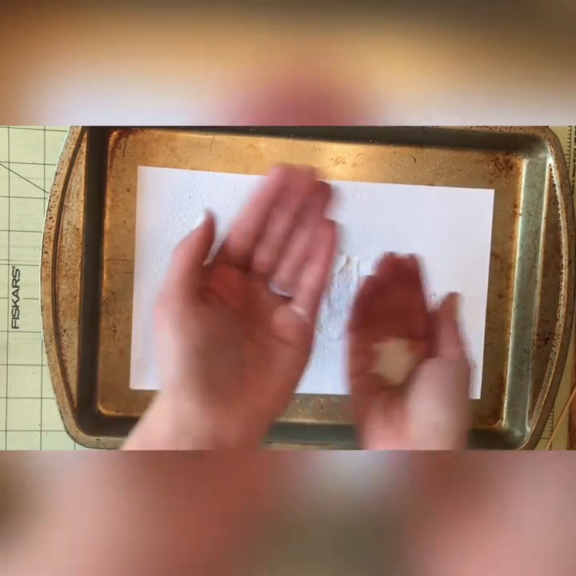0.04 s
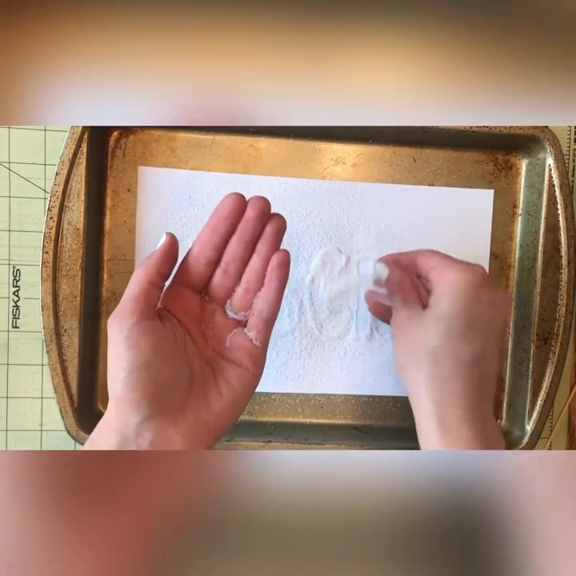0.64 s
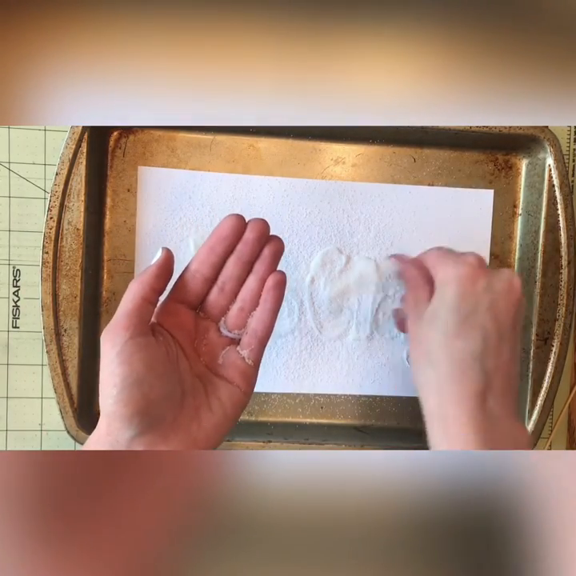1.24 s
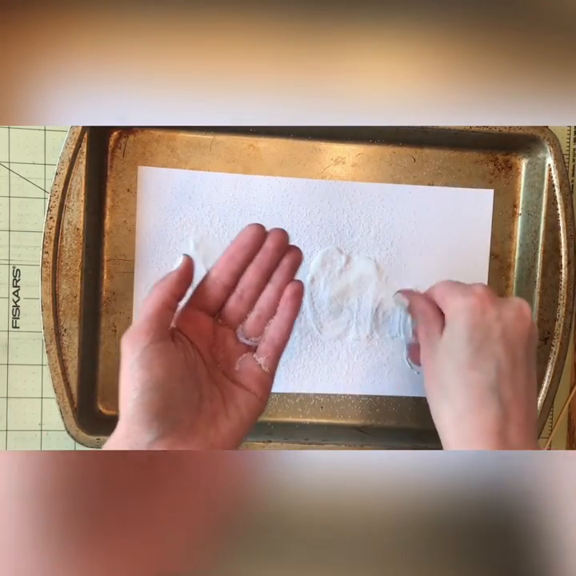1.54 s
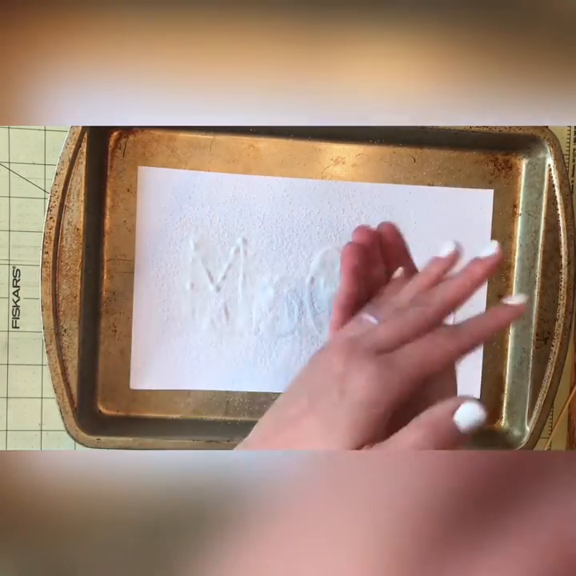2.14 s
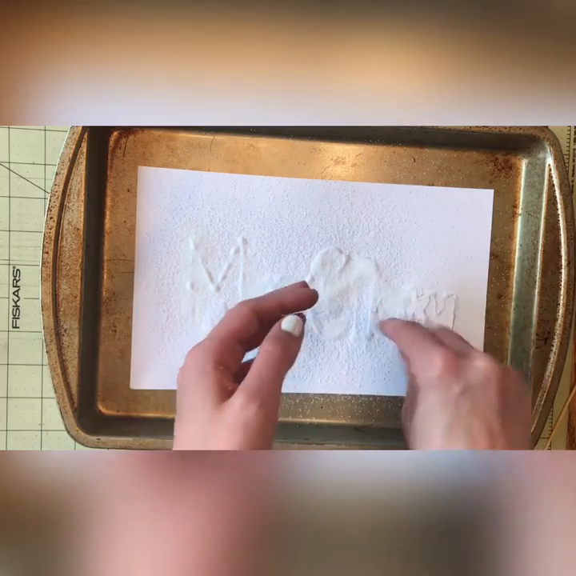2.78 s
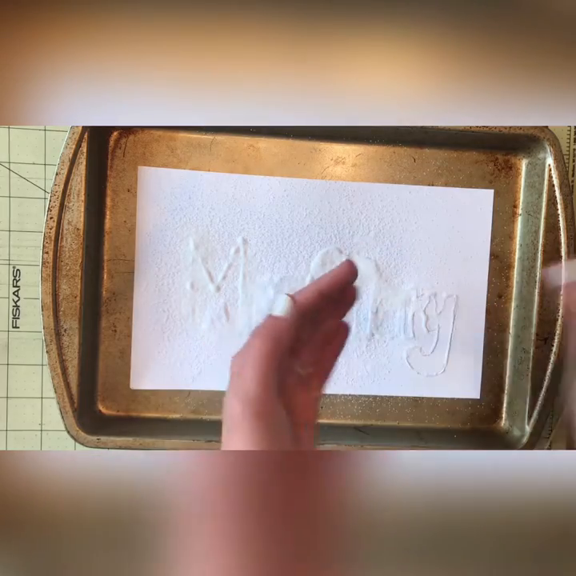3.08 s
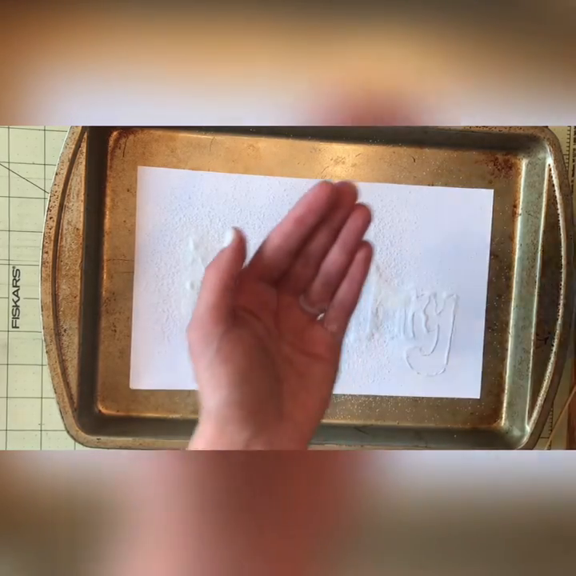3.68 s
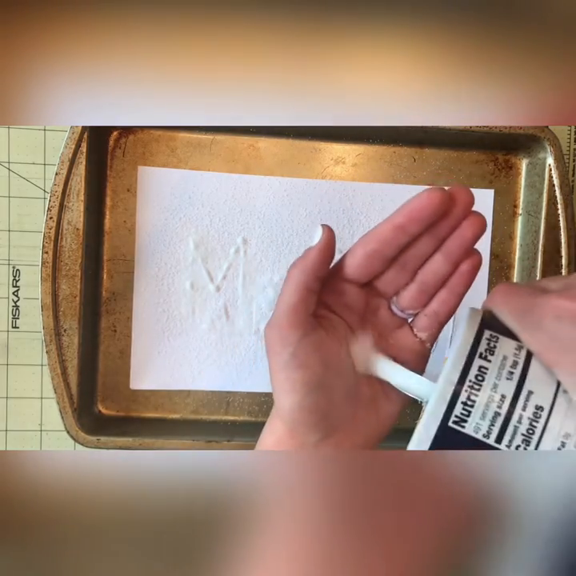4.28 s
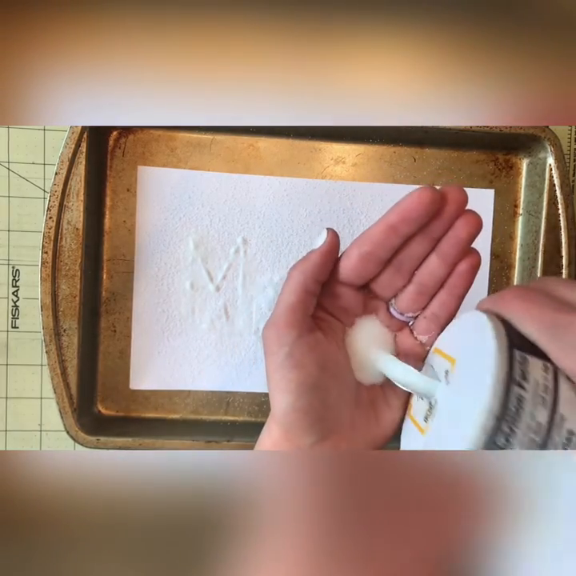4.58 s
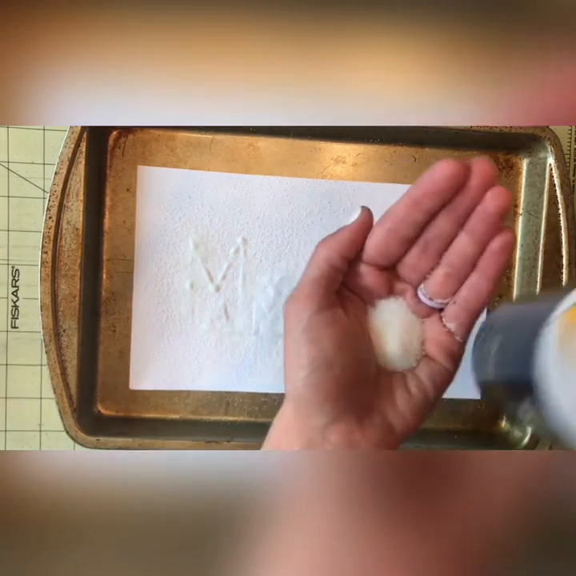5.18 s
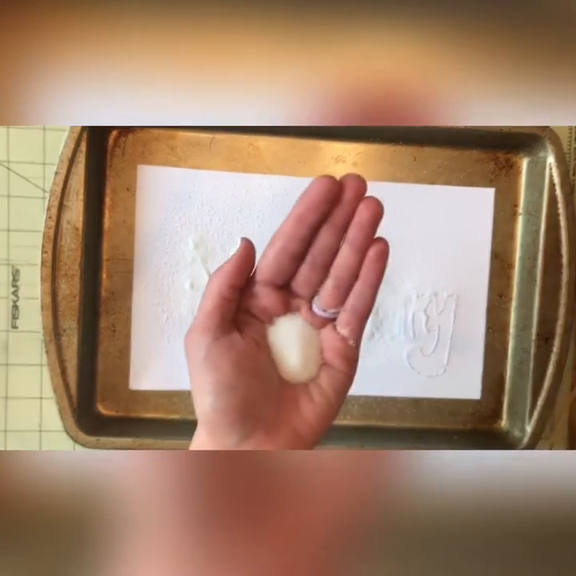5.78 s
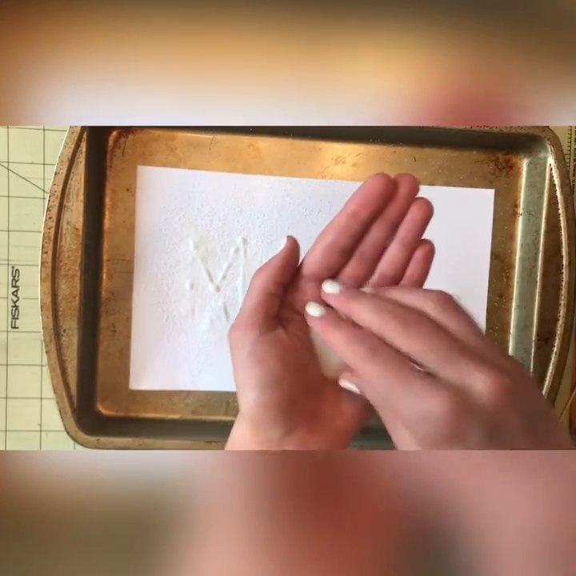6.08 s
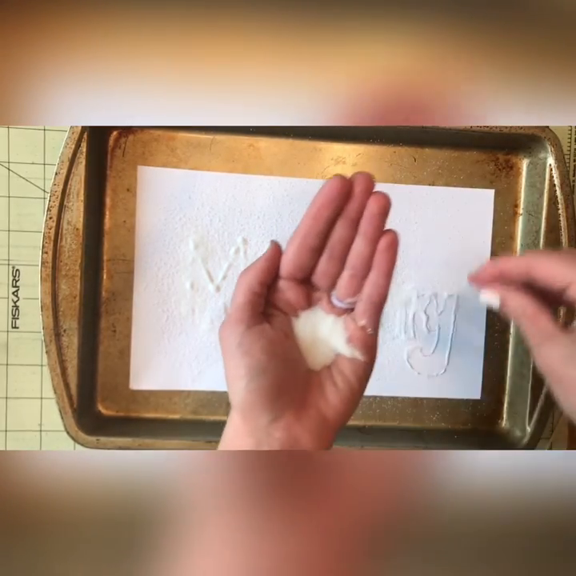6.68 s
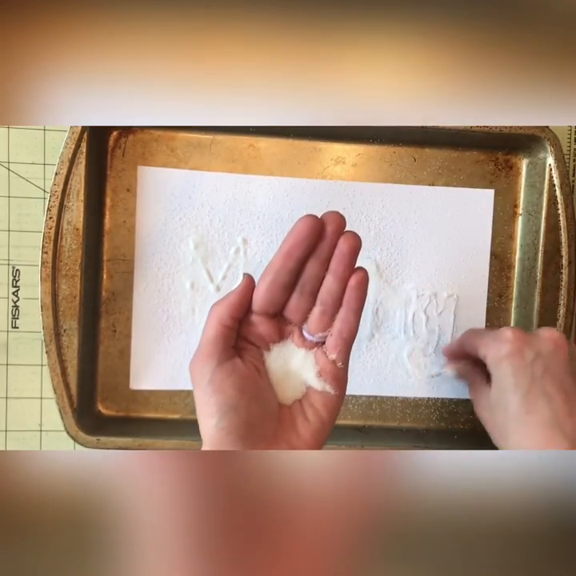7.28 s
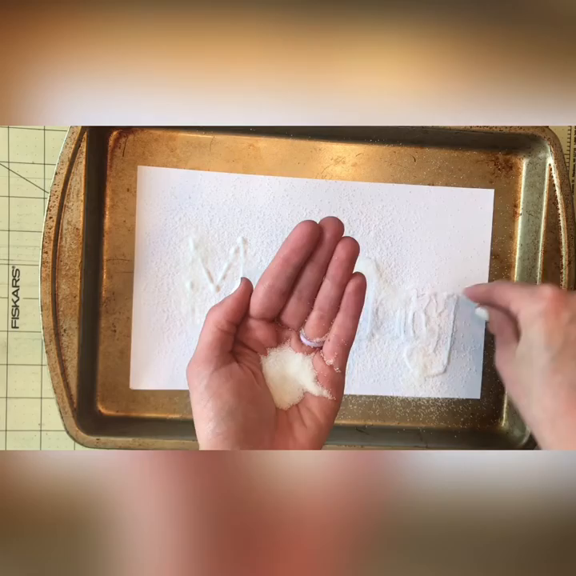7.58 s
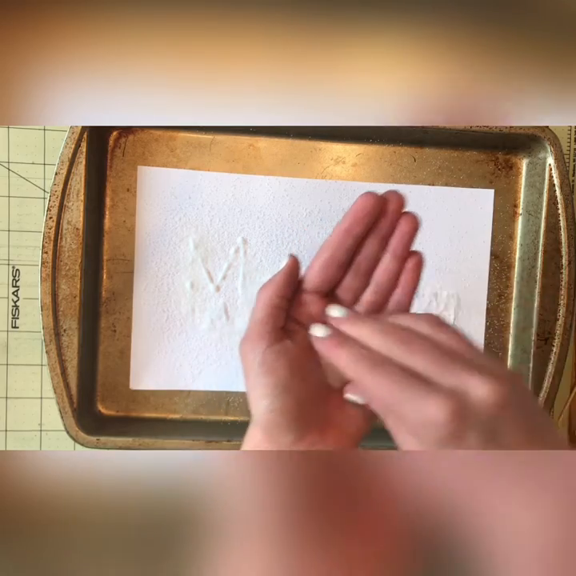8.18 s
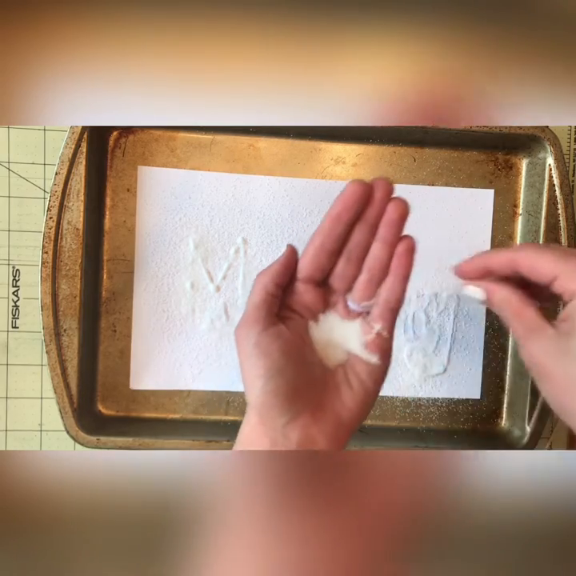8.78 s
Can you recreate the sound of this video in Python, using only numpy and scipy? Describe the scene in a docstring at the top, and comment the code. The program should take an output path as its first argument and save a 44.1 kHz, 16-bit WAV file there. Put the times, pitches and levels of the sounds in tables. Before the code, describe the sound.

From the start, salt falls from fingertips onto paper in a metal baking tray, close by: a fine, bright fizz and patter in uneven spurts, with soft rasps of rubbed crystals. From about 2 to 3.4 seconds the hands brush off the last grains with dry crackles and tiny ticks, ending in a soft knock. Around 3.7 seconds salt slides from a canister into the palm with a smooth, slightly hollow hiss; after small shakes, a second hiss follows from 5 to 5.4 as it tips back. At 5.6 the canister thuds onto the table and gives a sharp clack with a brief rattle, the loudest event. At 6.2 fingers scoop from the palm, and sprinkling returns from 6.5 to 8.2. Another rustling scoop at 8.3 leads to more sprinkling near 9. Faint ventilation and electric hum lie underneath in the small room.

```python
"""Salt, sprinkled by fingers, fizzes and patters on paper in a metal baking tray, close by in a small room.
Each grain is a tiny impact; pressed against skin, the crystals rasp, crunch and snap. The hands brush off
the last grains, and more salt slides from a canister into the palm with a smooth hiss. The canister is set
down with a thud and a sharp clack, then pinches are scooped from the palm and sprinkled again.
Ventilation murmurs and a faint electric hum lies underneath."""
import sys
import numpy as np
from scipy import signal
from scipy.io import wavfile
from scipy.ndimage import uniform_filter1d, map_coordinates

SR = 44100
rng = np.random.default_rng(int(sys.argv[2]) if len(sys.argv) > 2 else 0)


def pcm_store(signal):
    """Save signal as 16-bit PCM."""
    levels = np.round(np.clip(np.atleast_2d(signal), -1, 1) * 32767)
    wavfile.write(sys.argv[1], SR, levels.astype(np.int16).T)


N = 398663
TIME = np.arange(N) / SR

# the steady trickle, one list a pinch: t/s, fizz level/dB, patter level/dB, rustle level/dB
LONG_TRICKLES = [
    [(0.52, -51, -62, -55), (0.586, -43.5, -54, -69), (0.712, -51, -54, -57), (0.928, -47.5, -48, -52.5),
     (1.078, -48, -55.5, -52.5), (1.746, -50.5, -66, -56), (1.914, -53.5, -58.5, -54.5),
     (2.1, -68, -61, -67)],
    [(6.72, -49, -67, -55), (6.778, -61, -59, -53), (6.916, -47.5, -47, -61), (7.336, -48.5, -57.5, -54.5),
     (7.576, -53.5, -70, -57.5), (7.96, -49, -57, -60), (8.134, -58.5, -77, -63), (8.25, -68, -87, -85)],
]
SHORT_TRICKLES = [
    [(0.0, -49, -52, -49), (0.196, -45, -49.5, -47.5), (0.345, -52, -57, -56), (0.42, -62.5, -71, -61),
     (0.5, -57, -63, -69)],
    [(2.335, -58, -58.5, -75), (2.65, -53, -66, -53.5), (2.824, -61, -79, -64), (2.93, -66, -84, -69)],
    [(6.44, -63, -68, -67), (6.502, -50.5, -64, -49), (6.614, -54.5, -62.5, -66), (6.71, -61, -68, -65)],
    [(8.82, -55, -60, -54), (8.865, -47, -56, -55), (8.957, -50.5, -61, -53), (8.965, -38.5, -41, -47),
     (9.04, -41, -47.5, -47)],
]
# the fingers part and let a spurt go: t/s, fade/s, fizz level/dB, patter level/dB, rustle level/dB
SALT_SPURTS = [(0.115, 0.069, -43, -60, -67), (0.27, 0.076, -47.5, -48, -75),
               (0.544, 0.016, -31, -57, -48.5), (0.601, 0.055, -39, -52, -44.5),
               (0.783, 0.042, -42, -48.5, -54.5), (0.838, 0.037, -43.5, -45, -55),
               (1.059, 0.045, -42, -54, -86), (1.361, 0.047, -40.5, -44, -50.5),
               (1.651, 0.049, -45.5, -48, -69), (1.825, 0.038, -43.5, -50, -48.5),
               (1.877, 0.032, -41.5, -47, -48), (2.731, 0.044, -47, -53.5, -50),
               (6.456, 0.02, -43.5, -64, -45), (6.732, 0.017, -44, -66, -53),
               (6.758, 0.031, -35.5, -64, -62), (6.842, 0.15, -40, -44, -47.5),
               (7.179, 0.044, -46, -52.5, -48), (7.491, 0.092, -42, -50.5, -51),
               (7.62, 0.038, -47, -49, -71), (7.831, 0.052, -65, -58.5, -50),
               (8.029, 0.04, -42.5, -51, -54)]


def salt_flow(layer, trickle_db, rise_s=0.026):
    """How loud one layer of falling salt is: a trickle plus spurts that swell fast and trail off."""
    power = (amp(trickle_db) * level_curve(LONG_TRICKLES + SHORT_TRICKLES, layer + 1)) ** 2
    for s, fade, *levels in SALT_SPURTS:
        swell = bell(s, min(rise_s, fade / 2))
        stragglers = np.exp(-abs(TIME - s) / fade)
        power += (amp(levels[layer]) * np.where(TIME < s, swell, stragglers)) ** 2
    return np.sqrt(power)


# the tone of fine grains, of the paper, and of the rustle under cupped fingers: f/Hz, level/dB
FIZZ_TONE = [(2600, -42), (3300, -12), (4300, -30), (5000, -4), (7500, -3), (8700, 1.5), (9800, 1.5),
             (10400, -7), (11500, 0.5), (16000, -2)]
PATTER_TONE = [(1500, -20), (3500, -11), (4600, -8.5), (5300, 5.5), (6500, 4.5), (8000, -4.5),
               (10000, -11.5), (16000, -26)]
CUPPED_TONE = [(600, -34), (1500, -20), (2650, -9), (3100, -1), (3600, -1), (4400, -0.5), (5500, -7.5),
               (12000, -50)]
# the patter rings higher or lower as the hand above the paper changes shape: t/s, f/Hz
PATTER_PITCH = [(0.11, 6490), (0.27, 5710), (0.82, 6625), (0.95, 5560), (1.4, 6210), (2.73, 5364),
                (6.83, 5710), (7.0, 6600), (7.18, 5750), (7.62, 7040), (7.85, 5630)]


def sprinkle(resting_hz=5917):
    """Grains fall on the paper; a heavier flow means more of them each second."""
    fizz_gain = salt_flow(0, trickle_db=0.24)
    patter_gain = salt_flow(1, trickle_db=-0.5)
    rustle_gain = salt_flow(2, trickle_db=-3)
    flow = (fizz_gain + patter_gain) / amp(-38.5)
    clumps = drift(170)  # the same clumps sound in the fizz and the rustle
    fizz = toned(grains(5000 * flow + 600, spread_db=2.8, clump_db=0.64, clumps=clumps), FIZZ_TONE)
    patter = colour(grains(5000 * flow + 900, spread_db=7.1, clump_db=0.54), PATTER_TONE)
    patter = glide(patter, np.interp(TIME, *np.transpose(PATTER_PITCH)) / resting_hz)
    rustle = toned(grains(3000 * flow + 700, spread_db=4.1, clump_db=1.24, clumps=clumps), CUPPED_TONE)
    fizz += amp(-8.5) * coarse_grains()
    return fizz_gain * fizz + patter_gain * patter + rustle_gain * rustle


def coarse_grains(per_s=90, pitches=10):
    """A few large crystals land among the fine ones, each pinging at one of several pitches."""
    sizes = amp(2.2 * np.clip(rng.standard_normal(N), -2, 2))
    hits = sizes * (rng.random(N) < per_s / SR)
    kind = rng.integers(0, pitches, N)
    pitches_hz = np.geomspace(5000, 11000, pitches)
    pings = sum(resonate(hits * (kind == k), hz, hz / 2) for k, hz in enumerate(pitches_hz))
    return unit_rms(high_pass(pings, hz=4000))


# strokes of the fingertips: middle t/s, half length/s, level/dB
RUB_STROKES = [(0.035, 0.13, -54), (0.6, 0.05, -47.5), (0.742, 0.023, -57.5), (0.988, 0.053, -60.5),
               (1.126, 0.032, -55.5), (1.236, 0.075, -57), (1.93, 0.048, -55.5), (2.432, 0.066, -57.5),
               (8.44, 0.024, -58.5), (8.944, 0.069, -55)]
# the tone of their rasp: f/Hz, level/dB
RUB_TONE = [(900, -55), (1550, -18.5), (1900, -5.5), (2200, -1), (2600, -8), (4000, -24)]


def rub():
    """Crystals rasp as they are ground between the fingertips."""
    rasp = toned(grains(2500, spread_db=5.0, clump_db=2.5), RUB_TONE)
    return rasp * np.sqrt(sum((amp(db) * bell(s, half)) ** 2 for s, half, db in RUB_STROKES))


# fingers dig into the salt in the palm: start t/s, end t/s, level/dB
PALM_SCOOPS = [(6.211, 6.444, -55), (8.284, 8.598, -54.5)]
# the tone of salt in the open palm: f/Hz, level/dB
PALM_TONE = [(700, -17.5), (1500, -14.5), (2000, -3.5), (2500, -8.5), (3400, -1), (4200, -4.5),
             (5500, -7.5), (7300, -13.5), (16000, -18.5)]


def scoop(press_s=0.25, lift_s=0.051, closed_share=0.61, pitch_rise=0.42):
    """Salt rustles louder and higher as the fingers press and close, until the pinch is lifted."""
    open_hand = toned(grains(3000, spread_db=0.5, clump_db=2.0), PALM_TONE)
    closed_hand = toned(grains(2500, spread_db=3.5, clump_db=1.8), CUPPED_TONE)
    out = np.zeros(N)
    for start, end, db in PALM_SCOOPS:
        press = np.clip(np.minimum((TIME - start) / press_s, (end - TIME) / lift_s), 0, 1)
        progress = (TIME - start) / (end - start)
        closing = np.clip(closed_share * progress, 0, 1)
        rustle = np.sqrt(1 - closing) * open_hand + np.sqrt(closing) * closed_hand
        pitch_ratio = 1 + pitch_rise * (np.clip(progress, 0, 1) - .6)
        out += amp(db) * np.sqrt(press) * glide(rustle, pitch_ratio)
    return out


# skin presses on the salt: start t/s, end t/s, level/dB of the grains that snap off
SKIN_PRESSES = [(0.146, 0.502, -60.5), (1.952, 2.327, -61), (2.335, 2.583, -54), (2.966, 3.42, -64.5),
                (6.457, 6.795, -60.5), (8.582, 8.895, -58)]


def loose_grains(crumble_s=0.0004):
    """Crystals snap off the skin and crumble in flurries of dry crackle, some dull and some bright."""
    gain = level_curve([[(start, db), (end, db)] for start, end, db in SKIN_PRESSES], 1)
    flurries = amp(5 * np.clip(drift(70), -2, 2))
    snaps = grains(190 * flurries, spread_db=4.0, clump_db=0) * np.sqrt(flurries)
    crumbs = np.sqrt(linger(snaps ** 2, crumble_s)) * rng.standard_normal(N)
    crackle = unit_rms(snaps) + .7 * unit_rms(crumbs)
    dull = rng.random(N) >= .5
    return gain * unit_rms(toned(crackle * dull, PALM_TONE) + 0.77 * toned(crackle, FIZZ_TONE))


def crunch():
    """Pressed salt holds, then gives way in brief slips: a jumpy gain, near 1 when nothing presses."""
    pressed = sum(1. * (TIME > start) * (TIME < end) for start, end, _ in SKIN_PRESSES)
    pressure = uniform_filter1d(pressed, size=2000)
    slips = linger(grains(210, spread_db=1.0, clump_db=6.5) ** 2, fade_s=0.0027)
    share = np.clip(0.64 * pressure + 0.036, 0, 1)
    return np.sqrt(1 - share + share * slips / slips.mean())


# single coarse grains and fingernail ticks: t/s, relative level/dB, f/Hz
SHARP_TICKS = [(0.1403, -25.5, 4000), (0.193, -28, 6000), (0.352, -33, 6200), (0.473, -36, 5700),
               (0.9393, -35, 2140), (1.9622, -36, 2320), (2.0258, -35, 4900), (2.0533, -31.5, 4660),
               (2.106, -35, 5390), (2.1178, -32, 6330), (2.1414, -26, 4550), (2.234, -38, 3750),
               (2.252, -34, 5400), (2.288, -32, 4670), (2.3412, -36, 4900), (2.3545, -28, 5100),
               (2.389, -34, 10950), (2.4195, -26, 2047), (2.4662, -25.5, 4900), (2.523, -32.5, 5500),
               (2.7907, -33, 5800), (2.971, -37.5, 3220), (2.9998, -36, 6840), (3.05, -36.5, 4050),
               (3.0897, -34, 3750), (3.114, -43, 11200), (3.136, -36, 2040), (3.3294, -35.5, 5830),
               (5.362, -38, 3100), (5.4408, -36, 3700), (5.466, -37.5, 11500), (5.4834, -37.5, 12000),
               (5.4924, -35, 14000), (6.5056, -32, 3960), (6.622, -32, 5200), (6.689, -33, 2100),
               (6.7193, -35, 8000), (6.735, -28.5, 9650), (6.7545, -31, 8930), (6.785, -23, 7200),
               (6.832, -23, 5910), (8.4336, -30.5, 4650), (8.638, -33, 3190), (8.668, -31.5, 3190),
               (8.815, -33.5, 4570), (8.851, -30, 3800), (8.9063, -26.5, 2048)]


def ticks():
    """Each tick is a dry snap amid a little scrape of grains, thinner the higher it rings."""
    out = np.zeros(N)
    for s, db, hz in SHARP_TICKS:
        contact = burst(t60=.0045, push=.6)[:2048]
        snap = colour(contact, [(1400, -15.0), (2200, -8.0), (7000, -6.0), (16000, -7.5)])
        tick = high_pass(snap, hz / 2) + 2 * resonate(snap, hz, hz / 3)
        add(out, s + 0.001022, amp(db + 9.0) * unit_energy(tick))
        scrape = rng.standard_normal(700) ** 3 * np.hanning(700)  # cubing makes the noise spiky
        add(out, s - .006, amp(db - 2.0) * unit_energy(high_pass(scrape, hz / 2)))
    return out


def tray(salt, patterns=12, echo_gain=.22):
    """Tiny echoes off the tray and hands tint the grains; the tint shifts as the hands move."""
    t = np.arange(64) / SR
    hand_place = 7 * TIME + .4 * drift(3)
    out = salt.copy()
    for k in range(patterns):
        echoes = unit_energy(rng.standard_normal(len(t)) * (t > .0001) * amp(-60 * t / .003))
        nearness = np.clip(1 - abs((hand_place - k + 1) % patterns - 1), 0, 1)
        out += echo_gain * np.sqrt(nearness) * np.convolve(salt, echoes)[:N]
    return out


# salt slides as the canister tips forward, then back: t/s, hiss level/dB, relative body level/dB
POUR_LEVELS = [
    [(3.68, -57.5, -65.5), (3.838, -55, -64.5), (3.96, -44, -53.5), (4.03, -48, -56.5), (4.18, -43, -50),
     (4.48, -58.5, -69), (4.6, -68, -93)],
    [(4.896, -68, -70), (4.934, -61, -62), (5.012, -56, -65), (5.062, -47, -56), (5.138, -37, -50),
     (5.234, -37, -57), (5.288, -41, -69), (5.35, -60, -61.5), (5.44, -67, -75)],
]
# the tone of each of the two slides, and of the canister's body: f/Hz, level/dB
SLIDE_TONES = [
    [(3000, -16), (7000, -1.5), (9400, 1.5), (10400, 0.5), (11500, 2.5), (13000, 1), (16000, -1.5)],
    [(3000, -12.5), (7000, -7.5), (9700, -2.5), (10300, -4), (11200, 1.3), (13000, -4), (16000, -5.5)],
]
BODY_TONE = [(300, -4.5), (650, -10.5), (1050, -9.5), (1700, -6.5), (3200, -0.5), (4500, -1), (4950, -7.5),
             (5500, 2), (7000, -0.5), (12000, -8.5)]
# small shakes between the slides: t/s, level/dB
CANISTER_SHAKES = [(4.648, -61.5), (4.735, -68), (4.832, -61.5)]
# the notes of the air inside the canister: f/Hz, width/Hz, level/dB
AIR_NOTES = [(646, 110, 3), (1750, 350, 3), (3000, 600, -3)]


def pour(tipped_s=4.2, shake_half_s=0.013):
    """Countless sliding grains merge into a hiss; the canister rings hollow when tipped farthest."""
    stream = grains(36000, spread_db=3.0, clump_db=.5)
    wall_hits = grains(30000, spread_db=1.0, clump_db=1.3)
    hiss = sum(level_curve([rows], 1) * toned(stream, tone)
               for rows, tone in zip(POUR_LEVELS, SLIDE_TONES))
    shakes = sum(amp(db) * bell(s, shake_half_s) for s, db in CANISTER_SHAKES)
    body = (amp(3.5) * level_curve(POUR_LEVELS, 2) + shakes) * toned(wall_hits, BODY_TONE)
    air = rng.standard_normal(N)
    hollow = sum(amp(db) * resonate(resonate(air, hz, width), hz, width) for hz, width, db in AIR_NOTES)
    return hiss + body + amp(-58) * bell(tipped_s, half_s=0.074) * unit_rms(hollow)


# the canister meets the table: t/s, relative thud level/dB, relative clack level/dB
CANISTER_HITS = [(5.6113, -2.5, -41), (5.617, -11, -16), (5.6997, -15, -1), (5.7208, -15.5, -16),
                 (5.851, -50, -20.5), (5.86, -41, -30)]
# the notes of the table with the tray, and of the canister: f/Hz, level/dB, time to fade by 60 dB/s
TABLE_NOTES = [(168, 9, 0.87), (199, 21, 0.15), (242, 6, 0.25), (331, 8, 0.16), (630, -1, 0.12),
               (790, -9, 0.1), (950, -2, 0.15)]
CANISTER_NOTES = [(1273, 6.5, 0.077), (1635, 12, 0.065), (2120, 7.5, 0.08), (2480, 10, 0.045),
                  (3060, 10, 0.035), (4200, 10, 0.05), (4720, 6, 0.099)]
# the tone of the base's dull thud and of the rim's hard clack: f/Hz, level/dB
THUD_TONE = [(45, -15), (90, 6.5), (200, 7), (350, -1.5), (450, -6), (650, -1), (1000, -2.5), (1400, -11.5),
             (3000, -22), (8000, -29)]
CLACK_TONE = [(200, -27), (900, -20), (1250, 6), (1700, -1), (2300, 2.5), (3000, 5), (3500, 2), (4600, -1),
              (9000, -4.5), (16000, -17)]


def canister():
    """The base thumps the table, then the rim tips down, clacks and rattles."""
    out = np.zeros(N)
    table, shell = ring(TABLE_NOTES), ring(CANISTER_NOTES)
    push = signal.unit_impulse(len(table))
    for s, thud_db, clack_db in CANISTER_HITS:
        base = push + 1.8 * high_pass(burst(t60=.055), hz=330)
        rim = burst(t60=.017, push=.55)
        thud = amp(1.0) * unit_energy(colour(base, THUD_TONE)) + amp(-2.5) * table
        clack = amp(0.5) * unit_energy(colour(rim, CLACK_TONE)) + amp(-8.5) * shell
        add(out, s, amp(thud_db) * thud + amp(clack_db) * clack)
    return out


# soft knocks of handling: t/s, peak level/dB, f/Hz, time to fade by 60 dB/s
HANDLING_KNOCKS = [(3.333, -42, 200, 0.39), (3.428, -47.5, 1150, 0.019), (3.7194, -46, 960, 0.017)]


def knocks():
    """Handling makes dull knocks that ring a little around one pitch."""
    out = np.zeros(N)
    for s, db, hz, t60 in HANDLING_KNOCKS:
        tone = [(hz * .6, -12), (hz * .85, -1), (hz * 1.15, -1), (hz * 1.6, -14), (hz * 4, -35)]
        knock = colour(burst(t60), tone)
        add(out, s, amp(db) * knock / abs(knock).max())
    return out


# the hands brush together: middle t/s, half length/s, level/dB
SKIN_BRUSHES = [(3.552, 0.14, -67), (8.733, 0.055, -65)]


def brush():
    """Dry skin gives a soft hiss as the hands move."""
    skin = toned(rng.standard_normal(N), FIZZ_TONE)
    return skin * sum(amp(db) * bell(s, half) for s, half, db in SKIN_BRUSHES)


# how long the room rings: f/Hz, time to fade by 60 dB/s
ROOM_FADES = [(100, 0.23), (400, 0.73), (1500, 0.63), (4000, 0.4), (8000, 0.26)]


def room(sound, onset_s=0.0026):
    """The room's echoes blur into a tail in which each pitch dies at its own speed."""
    hz, t, bands = signal.stft(rng.standard_normal(SR), SR, nperseg=256)
    tail = signal.istft(bands * amp(-60 * t / value_at(ROOM_FADES, hz)[:, None]), SR)[1]
    tail *= np.clip(np.arange(len(tail)) / SR / onset_s, 0, 1)
    return signal.oaconvolve(sound, unit_energy(tail))[:N]


# the tone of the ventilation and of a faint hiss: f/Hz, level/dB
VENT_TONE = [(35, -25), (70, -2), (95, -6.5), (125, 1), (150, -4.5), (210, 0), (310, -6), (420, -14.5),
             (620, -16), (900, -24.5), (3000, -64)]
HISS_TONE = [(300, -12.5), (1000, 6.5), (2000, 5), (4000, 1), (8000, -4.5), (16000, -5.5)]


def background(hum_hz=51.2):
    """Low ventilation murmur with a soft drone, a wavering electric hum and faint hiss."""
    murmur = toned(rng.standard_normal(N), VENT_TONE)
    drone_tone = [(170, -38.0), (200, -9.0), (213, 1.0), (228, -9), (270, -33.5), (900, -77.5)]
    drone = toned(rng.standard_normal(N), drone_tone)
    hum_phase = 2 * np.pi * np.cumsum(hum_hz + 0.62 * drift(5.6)) / SR
    hum = np.sqrt(2) * np.sin(hum_phase) * amp(0.13 * drift(5.1))
    hiss = toned(rng.standard_normal(N), HISS_TONE)
    drone *= amp(1.2 * drift(8.1))
    return amp(-58.5) * murmur + amp(-64) * drone + amp(-59) * hum + amp(-67.5) * hiss


def grains(per_s, spread_db, clump_db, clumps=None):
    """Random clicks of uneven size, louder in clumps; more a second sounds denser, not louder."""
    clumps = drift(130) if clumps is None else clumps
    chance = np.clip(per_s / SR, 1e-3, 1)
    size = amp(spread_db * np.clip(rng.standard_normal(N), -2, 2) + clump_db * clumps)
    return size * rng.choice([-1., 1.], N) * (rng.random(N) < chance) / np.sqrt(chance)


def burst(t60, push=0):
    """Two things touch: a first push, then a chatter that fades by 60 dB in t60 seconds."""
    t = np.arange(SR // 2) / SR
    chatter = unit_energy(rng.choice([-1., 1.], len(t)) * amp(-60 * t / t60))
    return unit_energy(chatter + push * (t == 0))


def ring(notes):
    """The dying notes of a struck thing, every other one flipped in sign."""
    t = np.arange(SR // 2) / SR
    return unit_energy(sum((-1) ** k * amp(db - 60 * t / t60) * np.sin(2 * np.pi * hz * t)
                           for k, (hz, db, t60) in enumerate(notes)))


def drift(per_s):
    """A random wander that heads for a new value per_s times a second."""
    targets = rng.standard_normal(4096)
    return unit_rms(np.interp(TIME * per_s, np.arange(len(targets)), targets))


def bell(s, half_s):
    """A smooth swell and fall around time s."""
    return np.exp(-.5 * ((TIME - s) / half_s) ** 2)


def level_curve(stretches, column, edge_s=0.014):
    """Joins the levels of several stretches into one gain, silent in between."""
    gain = np.zeros(N)
    for rows in stretches:
        s, db = np.transpose(rows)[[0, column]]
        inside = np.clip(np.minimum(TIME - s[0], s[-1] - TIME) / edge_s + 1, 0, 1)
        gain += inside * amp(np.interp(TIME, s, db))
    return gain


def colour(x, tone, size=4096):
    """Filters a sound to a tone (f/Hz, level/dB), falling away below the first row."""
    hz = abs(np.fft.fftfreq(size, 1 / SR))
    gain = amp(value_at(tone, hz)) * np.minimum((hz + 1) / tone[0][0], 1) ** 2
    log_gain = np.log(np.maximum(gain, 1e-5))
    taps = np.fft.ifft(np.exp(np.conj(signal.hilbert(log_gain)))).real  # rings only after a hit
    return signal.oaconvolve(x, taps[:size // 2])[:len(x)]


def toned(x, tone):
    """Gives a sound a tone and an average power of 1."""
    return unit_rms(colour(x, tone))


def glide(x, ratio):
    """Bends the pitch of a steady sound by playing it at a changing speed."""
    fine = signal.resample_poly(x, 2, 1)
    position = 2 * np.cumsum(ratio) % (len(fine) - 1)
    return unit_rms(map_coordinates(fine, [position], order=3))


def resonate(x, hz, width_hz):
    """Lets through one band of pitches around hz."""
    return signal.lfilter(*signal.iirpeak(min(hz, SR / 3), hz / width_hz, fs=SR), x)


def high_pass(x, hz):
    """Takes out the bass."""
    return signal.sosfilt(signal.butter(2, hz, "high", fs=SR, output="sos"), x)


def linger(x, fade_s):
    """Gives each spike a fading tail."""
    return signal.lfilter([1], [1, -np.exp(-1 / (fade_s * SR))], x)


def value_at(table, hz):
    """Reads between a table's rows, with octaves evenly spaced."""
    f, value = np.transpose(table)
    return np.interp(np.log(hz + 1), np.log(f + 1), value)


def add(mix, s, sound):
    """Mixes a sound in at time s."""
    part = mix[max(round(s * SR), 0):][:len(sound)]
    part += sound[:len(part)]


def amp(db):
    """Turns decibels into a gain."""
    return 10 ** (np.asarray(db) / 20)


def unit_rms(x):
    """Scales to an average power of 1."""
    return x / np.sqrt(np.mean(x ** 2) + 1e-20)


def unit_energy(x):
    """Scales to a total energy of 1."""
    return x / (np.linalg.norm(x) + 1e-12)


def scene():
    """Salt close by, the canister farther off with more echo; both channels alike."""
    handled_salt = crunch() * (sprinkle() + rub() + scoop() + brush()) + loose_grains()
    close = tray(handled_salt) + ticks() + knocks() + pour()
    landing = canister()
    echo = room(high_pass(amp(-12.5) * close + amp(-9) * landing, hz=200))
    mono = close + landing + echo + background()
    return np.array([mono, mono])


def record(dry, low_hz=42, high_hz=15850):
    """Takes out deep rumble and the very highest treble."""
    clean = signal.sosfilt(signal.butter(4, low_hz, "high", fs=SR, output="sos"), dry)
    treble_cut = signal.firwin(511, high_hz, window=("kaiser", 9), fs=SR)
    return signal.oaconvolve(clean, treble_cut[None], "same")


dry = scene()
out = record(dry)
pcm_store(out)
```